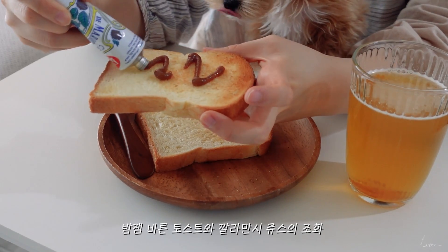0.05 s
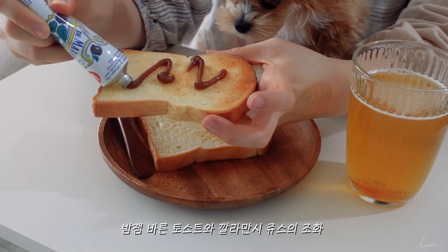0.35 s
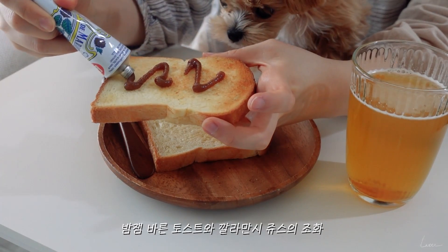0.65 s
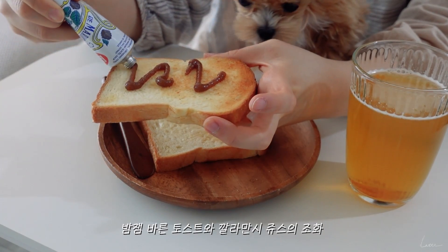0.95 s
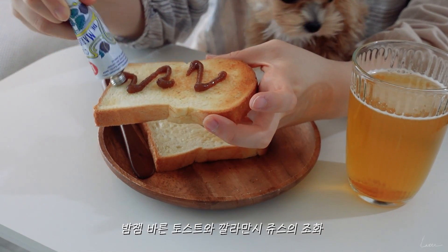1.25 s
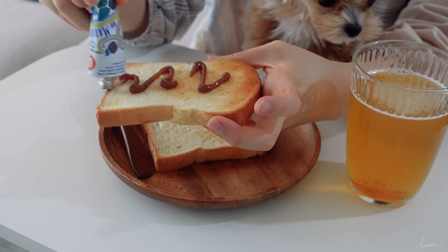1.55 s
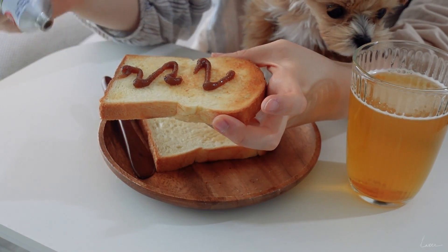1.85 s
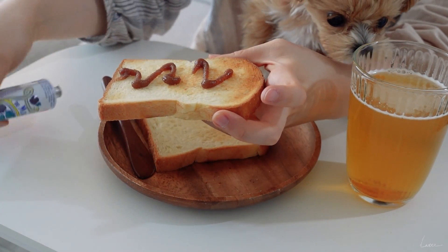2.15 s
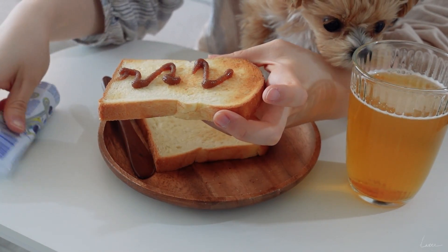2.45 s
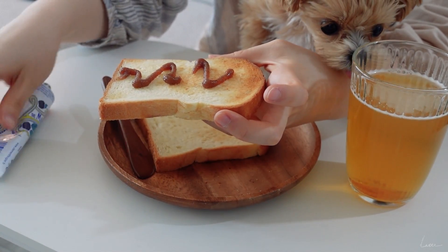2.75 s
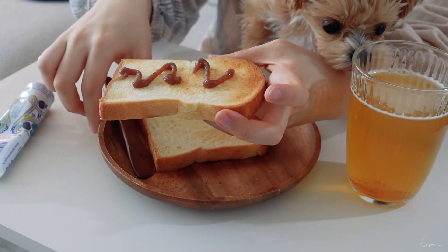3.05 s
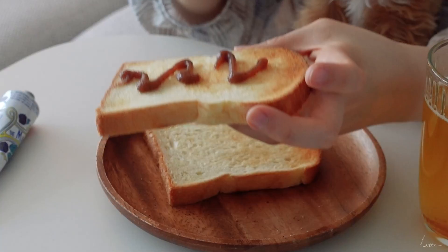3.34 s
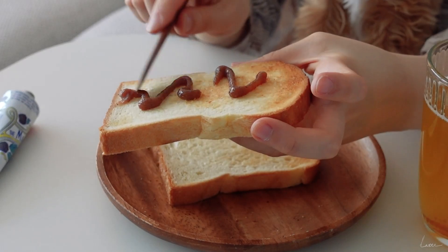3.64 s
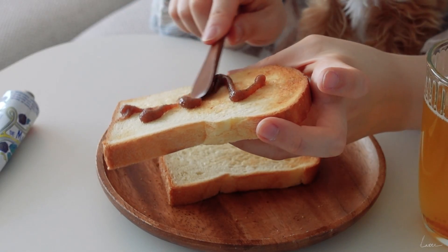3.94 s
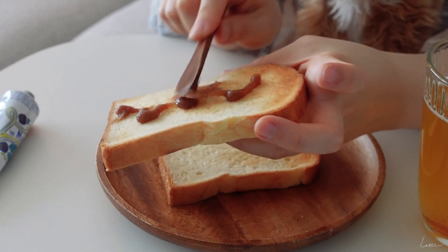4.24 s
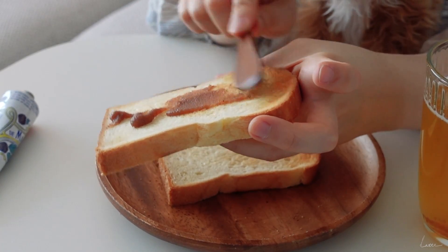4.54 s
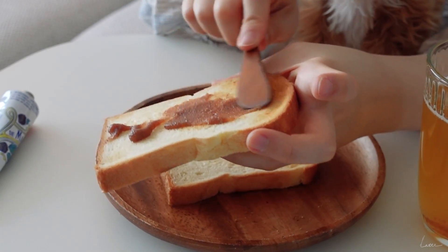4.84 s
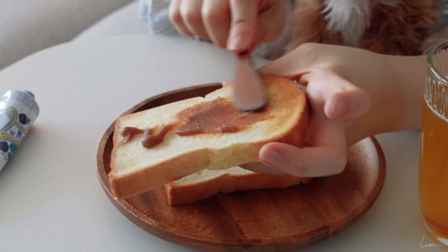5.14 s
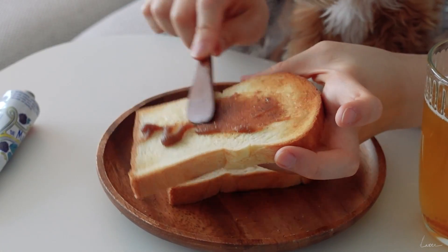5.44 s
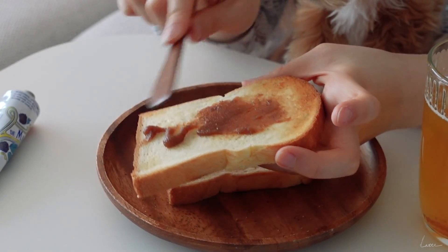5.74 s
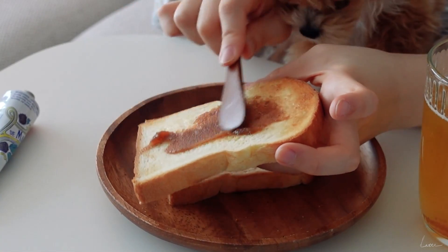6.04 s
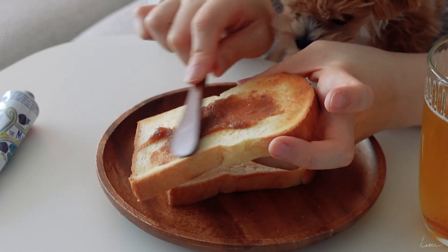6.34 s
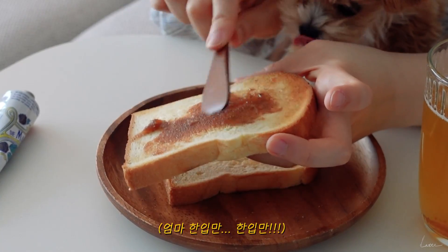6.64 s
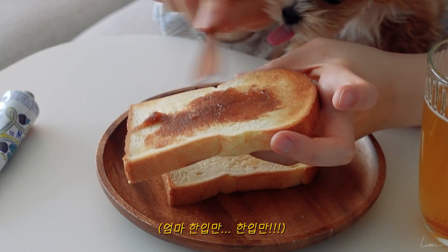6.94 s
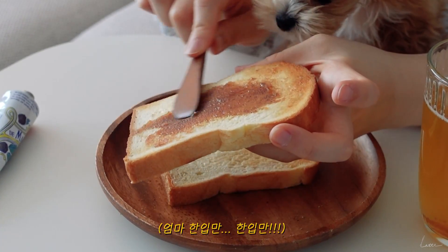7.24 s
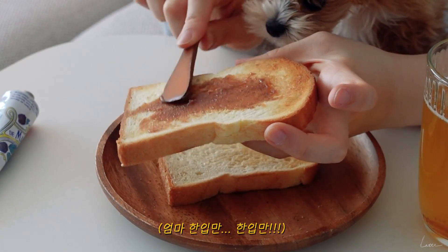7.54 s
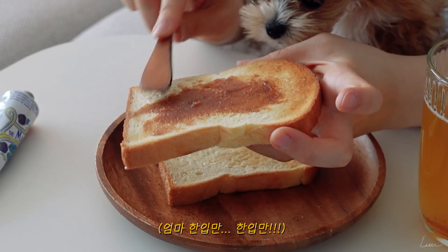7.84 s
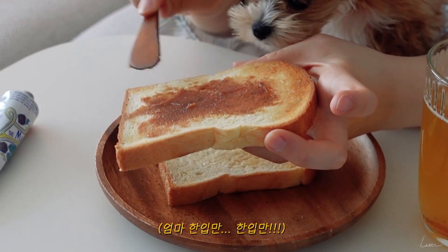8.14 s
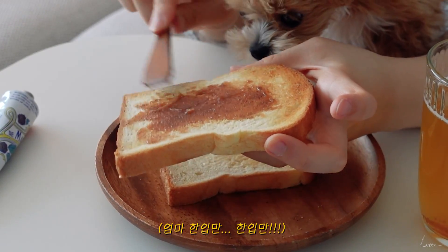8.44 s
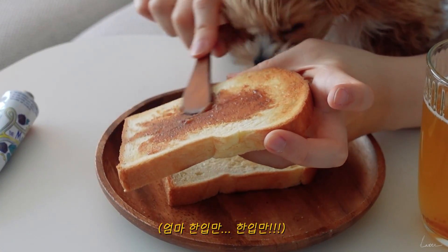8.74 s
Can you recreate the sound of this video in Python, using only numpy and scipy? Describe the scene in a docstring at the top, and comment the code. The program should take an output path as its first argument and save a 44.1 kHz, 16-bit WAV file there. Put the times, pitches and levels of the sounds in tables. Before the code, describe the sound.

A tube of paste crinkles and ticks softly as it is squeezed. It is then put down with two quick knocks that make the tabletop ring briefly, the loudest sounds here. A small knife slides off a plate with a faint metallic whisper, then spreads the paste over toast in short, scratchy strokes with tiny crust snaps. Everything is close and in stereo, in a quiet room with a steady, soft rush of air.

```python
"""A soft, steady rush of air fills a quiet room; all else is close by, in stereo. Chestnut paste is
squeezed from a crinkling tube onto toast. Near 2.4 s the tube is put down with two knocks, end first,
then flat, and the table rings. A small knife slides off the plate, its blade singing faintly. From 3.8 s
it spreads the paste in short strokes; the crust breaks under it as fine grains and ticks."""
import sys
import numpy as np
from scipy import signal
from scipy.fft import rfft, irfft
from scipy.io import wavfile

SR = 44100
rng = np.random.default_rng(int(sys.argv[2]) if len(sys.argv) > 2 else 0)


def master(y):
    """Save y as 16-bit WAV."""
    cut = np.clip(np.atleast_2d(y).T, -1, 1)
    pcm = np.round(cut * 32767)  # scale
    wavfile.write(sys.argv[1], SR, pcm.astype(np.int16))


N = 392049
TIME_S = np.arange(N) / SR
FREQ_HZ = np.maximum(np.arange(N + 1) * SR / (2 * N), 1)


def undb(db):
    """dB to gain."""
    return 10 ** (np.asarray(db) / 20)


def unit(x):
    """Scale to energy 1."""
    return x / np.sqrt(np.sum(x ** 2))


def fade(t, t60_s):
    """Exponential decay, 60 dB down at t60_s."""
    return np.exp(-np.log(1000) * t / t60_s)


def on_log(points, hz=FREQ_HZ):
    """Interpolate (Hz, value) points over log frequency."""
    point_hz, value = np.transpose(points)
    return np.interp(np.log(hz), np.log(point_hz), value)


def shaped_noise(db):
    """White noise filtered by a dB curve over FREQ_HZ."""
    return irfft(rfft(rng.standard_normal(N), 2 * N) * undb(db))[:N]


def band(x, lo_hz, hi_hz):
    """Band-pass; peak 1."""
    sos = signal.butter(3, [lo_hz, min(hi_hz, 0.45 * SR)], "bandpass", fs=SR, output="sos")
    y = signal.sosfilt(sos, x)
    return y / np.abs(y).max()


def response(points, tilt_db_oct=0, size=1024):
    """Minimum-phase impulse response of (Hz, dB) points, tilted above 1 kHz; energy 1."""
    hz = np.maximum(np.arange(size + 1) * SR / (2 * size), 1)
    db = on_log(points, hz) + tilt_db_oct * np.log2(np.maximum(hz, 1000))
    cepstrum = irfft(np.log(undb(db)))
    cepstrum[1:size] *= 2
    cepstrum[size + 1:] = 0
    return unit(irfft(np.exp(rfft(cepstrum)))[:size])


def waver(rate_hz, depth_db):
    """Gain gliding between random levels."""
    levels = rng.standard_normal(2048)
    return undb(depth_db * np.interp(TIME_S * rate_hz, np.arange(len(levels)), levels))


def add(track, start_s, sound):
    """Mix sound into track at start_s."""
    start = int(round(start_s * SR))
    part = sound[:max(N - start, 0)]
    track[start:start + len(part)] += part


def place(x, pan_db):
    """Mono to stereo; pan_db is left minus right."""
    return x * undb(np.array([[pan_db], [-pan_db]]) / 2)


def air(level_db=-62.5):
    """Ventilation: a soft, wide rush with broad resonances and a slight flicker."""
    # Each row: frequency in Hz, relative level in dB.
    spectrum = [(25, -19), (60, -18), (105, -6), (200, -0.5), (400, 0), (700, -2), (1300, -10),
                (2200, -5.5), (2700, -12), (4000, -15.5), (7000, -20.5), (15500, -22.5)]
    # Each row: centre in Hz, width in Hz, lift in dB.
    resonances = [(449, 62, 4.2), (1069, 240, 8), (1436, 230, 5.9), (2330, 150, 5)]
    # Each row: frequency in Hz, side minus mid in dB.
    stereo_width = [(60, -8.5), (200, -1.5), (700, -0.5), (1300, 1), (2400, 3), (4400, -1), (8000, 0.5),
                    (15000, -16)]
    lift_db = sum(db / (1 + (2 * (FREQ_HZ - hz) / width_hz) ** 2) for hz, width_hz, db in resonances)
    mid_db = on_log(spectrum) + lift_db
    mid = shaped_noise(mid_db)
    side = shaped_noise(mid_db + on_log(stereo_width))
    rush = unit(np.array([mid + side, mid - side])) * np.sqrt(2 * N)
    return rush * undb(level_db) * waver(rate_hz=10, depth_db=1.02)


def room(x, first_s=0.0026, build_s=0.0076):
    """Diffuse reflections of a small room, wider in the treble."""
    # Each row: nominal band centre in Hz, t60 in seconds.
    decays = [(150, 1), (600, 0.59), (1400, 0.48), (3000, 0.39), (6000, 0.43), (14000, 0.4)]
    edges_hz = [0, 300, 900, 2000, 4200, 9000, SR]
    t, tail = TIME_S[:SR], 0
    noise = rfft(rng.standard_normal((2, SR)))
    hz = np.arange(noise.shape[1])
    for lo_hz, hi_hz, (centre_hz, t60_s) in zip(edges_hz, edges_hz[1:], decays):
        mid, side = irfft(noise * ((hz >= lo_hz) & (hz < hi_hz)), SR) * fade(t, t60_s)
        side = side * undb(on_log([(1300, -9), (3200, -3)], centre_hz))
        tail = tail + np.array([mid + side, mid - side])
    onset = np.clip((t - first_s) / build_s, 0, 1)
    tail = unit(tail * onset) * np.sqrt(2)
    return signal.fftconvolve(x[None], tail, axes=1)[:, :N]


def blade(start_s=3.09, end_s=3.46, ramp_s=0.016, level_db=-77):
    """Uneven friction excites the steel blade as it slides off the plate."""
    # Each row: centre in Hz, width in Hz, relative level in dB.
    resonances = [(3100, 420, -1), (4240, 280, 4), (5100, 540, -5), (6400, 820, 0.5), (9470, 420, -3)]
    gain = sum(undb(db) / (1 + (2 * (FREQ_HZ - hz) / width_hz) ** 2) for hz, width_hz, db in resonances)
    ring = unit(shaped_noise(20 * np.log10(gain))) * np.sqrt(N)
    contact = np.clip(np.minimum(TIME_S - start_s, end_s - TIME_S) / ramp_s, 0, 1)
    return undb(level_db) * ring * contact * waver(rate_hz=45, depth_db=2.5)


def chatter(t60_s, first_db, size=4096):
    """An impact and a dying train of tiny ones; flat spectrum, energy 1."""
    envelope = fade(TIME_S[:size], t60_s)
    x = unit(rng.standard_normal(size) * envelope)
    x[0] += undb(first_db)
    for _ in range(8):  # whiten, then restore the decay
        spectrum = rfft(x)
        x = irfft(spectrum / np.abs(spectrum)) * np.minimum(5 * envelope, 1)
    return unit(x)


def knocks(swell_s=0.0014):
    """The tube lands end first, then flat: each contact chatters and rings the table top."""
    # Each row: start in seconds, clack energy in dB, clack t60 in seconds, ring gain in dB.
    landings = [(2.3788, 0.5, 0.058, -30.5), (2.5565, 1.5, 0.025, -26)]
    # Clack spectra. Each row: frequency in Hz, relative level in dB.
    end_clack = [(60, -43), (100, -42), (324, -25), (700, -8.5), (1150, 0), (1450, 2.5), (1770, -10.5),
                 (2150, -7), (2800, -10.5), (4000, -18.5), (4600, -27), (6000, -27), (8000, -39),
                 (15000, -59)]
    flat_clack = [(60, -36.5), (200, -34), (420, -7.5), (800, -10.5), (1100, -10), (1450, 1), (1800, -6),
                  (2300, -6.5), (3050, -0.5), (3450, -7), (3900, -5), (4500, -13.5), (6000, -20.5),
                  (8000, -31.5), (15000, -48)]
    # Table and tube. Each row: frequency in Hz, t60 in seconds, end-hit level in dB, flat-hit level in dB.
    table_modes = [(179, 0.22, -47, -27), (247, .35, -35, -29.5), (368, .39, -33, -21),
                   (493, 0.25, -20, -11.5), (618, 0.36, -11, -19), (670, .36, -8.5, -28),
                   (762, .25, -9, -15), (982, 0.22, -5, 0), (1110, 0.5, -17.5, -21), (1186, 0.12, -7, -18),
                   (1270, 0.25, -5, -9), (1210, 0.36, -18.5, -22), (1395, 0.35, -1, -13),
                   (1380, 0.15, -23, 5.5), (1530, .25, -19, -13.5), (1620, 0.29, -24, -30),
                   (2015, 0.32, -20, -12), (2076, 0.21, -6, -6.5), (2940, .2, -22.5, -19),
                   (2885, .14, -25, -10.5), (3070, 0.27, -25, -8), (3070, 0.18, -22, -17),
                   (3790, .17, -24, -6), (3950, 0.2, -21, -25), (5000, 0.2, -28, -19),
                   (5820, 0.28, -35, -25)]
    hz, t60_s, *strike_db = np.transpose(table_modes)[:, :, None]
    clacks, rings, t = np.zeros(N), np.zeros(N), TIME_S[:SR]
    for landing, spectrum, mode_db in zip(landings, (end_clack, flat_clack), strike_db):
        start_s, clack_db, clack_t60_s, ring_db = landing
        clack = signal.fftconvolve(chatter(clack_t60_s, first_db=-7), response(spectrum))
        add(clacks, start_s, undb(clack_db) * unit(clack))
        phase = 2 * np.pi * rng.random(hz.shape)
        modes = undb(mode_db) * fade(t, t60_s) * np.sin(2 * np.pi * hz * t + phase)
        add(rings, start_s, undb(ring_db) * modes.sum(0) * (1 - np.exp(-t / swell_s)))
    return clacks, rings


def ticks(rows, band_ratio=1.47, gain_db=1):
    """Each quick crack rings a broad resonance, with a bright snap on top."""
    out = np.zeros(N)
    for start_s, peak_db, hz, treble_db in rows:
        crack = chatter(t60_s=0.0073, first_db=-2, size=1024)
        ring = band(crack, hz / band_ratio, hz * band_ratio)
        tick = ring + undb(treble_db) * band(crack, 6260, 10600)
        add(out, start_s, undb(peak_db + gain_db) * tick / np.abs(tick).max())
    return out


def snaps():
    """Loud single snaps of crust, tube and knife."""
    # Each row: start in seconds, relative peak in dB, ring in Hz, treble over ring in dB.
    cracks = [(.0112, -36, 3300, 2.5), (.3917, -52, 4100, -2), (.8395, -41.5, 3020, -7),
              (.9138, -38.5, 3900, -1), (1.1042, -49, 4900, 6), (2.801, -40, 2300, -9),
              (2.828, -48, 2700, -10), (3.805, -46.5, 3920, -16), (3.836, -35.5, 3250, -9),
              (3.9452, -39.5, 5500, 0), (3.958, -38.5, 3600, -2), (5.248, -42.5, 2780, -3),
              (5.518, -44, 3780, -1.5), (5.5452, -41, 3200, 7), (6.5037, -37, 6140, -2),
              (6.921, -39.5, 3100, -33), (8.7442, -45, 5900, -28), (8.82, -48, 2970, -1)]
    return ticks(cracks)


def pressure(t, length_s, attack_share=0.46, release_s=0.016, cling_db=-13, cling_s=0.17):
    """Stroke force: builds, holds, lets go; sticky paste keeps a little contact."""
    attack = np.sin(np.pi / 2 * np.minimum(t / (attack_share * length_s), 1)) ** 2
    after_s = np.maximum(t - length_s, 0)
    cling = undb(cling_db)
    return attack * ((1 - cling) * np.exp(-after_s / release_s) + cling * np.exp(-after_s / cling_s))


def crumbs(strokes, rate_hz=18, over_db=10, spread_db=4.5, ring_hz=3530, treble_db=-8.5, tries=8):
    """Lesser snaps at random within each stroke, louder under more force."""
    rows = []
    for start_s, length_s, level_db, *_ in strokes:
        chance, position = rng.random((2, tries))
        offset_s = position * length_s
        force_db = level_db + 20 * np.log10(pressure(offset_s, length_s))
        peak_db = force_db + over_db + spread_db * rng.standard_normal(tries)
        breaks = chance < rate_hz * length_s / tries
        rows += [(start_s + s, db, ring_hz, treble_db) for s, db in zip(offset_s[breaks], peak_db[breaks])]
    return ticks(rows)


def rubbing(strokes, resonances, grains_per_s, spread_db, catches_per_s, catch_db, colour_db, gain_db):
    """Each stroke breaks a shower of tiny grains; the contact catches and slips unevenly."""
    # Rasp spectrum. Each row: frequency in Hz, relative level in dB.
    crust = [(40, -56), (150, -15.5), (500, -6.5), (1000, -5), (1500, -1.5), (1950, -1), (3100, 1.5),
             (4500, -5), (5700, 0.5), (6500, -4), (10300, -9), (11500, -15.5), (15500, -21)]
    out, t = np.zeros(N), TIME_S[:SR]
    hz, width_oct = np.geomspace(40, 16000, 96), 0.36
    peaks = sum(share * np.exp(-(np.log2(hz / centre) / width_oct) ** 2) for centre, share in resonances)
    for start_s, length_s, level_db, tilt_db_oct, lift_db in strokes:
        sizes = undb(spread_db * np.minimum(rng.exponential(size=SR), 4))
        grains = (rng.random(SR) < grains_per_s / SR) * sizes * rng.choice([-1, 1], SR)
        slip_index = np.cumsum(rng.random(SR) < catches_per_s / SR)
        grains *= undb(catch_db * rng.standard_normal(SR + 1))[slip_index]
        drive = unit(grains) * np.sqrt(SR) * pressure(t, length_s)
        # every patch rings a little differently
        patch_db = on_log(crust, hz) + lift_db * peaks + colour_db * rng.standard_normal(len(hz))
        rasp = signal.fftconvolve(drive, response(np.column_stack([hz, patch_db]), tilt_db_oct))
        add(out, start_s, undb(level_db + gain_db) * rasp)
    return out


def handling(wall_hz=5000, wall_lift_db=0.5):
    """The tube crinkles as it is squeezed and let go; the knife rubs off the plate."""
    # Each row: start in seconds, length in seconds, relative level in dB, tilt in dB per octave.
    moves = [(0, 0.0084, -46.5, -1.5), (0.041, 0.063, -64, -6), (0.271, 0.18, -71.5, -1),
             (0.497, 0.29, -75.5, 0), (0.824, 0.047, -64, -0.5), (0.908, 0.013, -60, -0.5),
             (1.081, 0.12, -66, 2.5), (1.263, .14, -62.5, 0), (1.587, 0.06, -66, -3),
             (2.816, 0.032, -54, -8), (3.149, 0.14, -65, -5.5)]
    strokes = [(*move, wall_lift_db) for move in moves]
    crinkle = rubbing(strokes, [(wall_hz, 1)], grains_per_s=2900, spread_db=4,
                      catches_per_s=140, catch_db=2.5, colour_db=1.5, gain_db=-1)
    return crinkle + crumbs(strokes)


def spreading():
    """The knife rasps over the toast; drier crust makes the edge bite and lifts its resonances."""
    # Each row: start and length in seconds, relative level in dB, tilt in dB per octave, bite in dB.
    strokes = [(3.765, 0.13, -52.5, -1.3, 1.5), (3.881, 0.036, -54.5, 4, 6), (3.935, .025, -58, 3, 2),
               (4.036, .05, -64, -3, 0.5), (4.535, 0.037, -59, -3.5, 11), (4.905, .022, -66, 5, 0),
               (5.234, 0.057, -54, -3.5, 13.5), (5.263, .275, -60.5, -2, 6), (5.656, 0.068, -65, -3, 5),
               (5.932, 0.036, -61, -3.5, 5), (6.33, 0.06, -67, 4, 0), (6.391, 0.16, -51.5, 1.5, 0),
               (6.772, 0.031, -64, -2.5, 3), (6.835, .045, -60.5, 1.5, 7), (7.172, 0.029, -66.5, -4, 6),
               (7.517, 0.04, -59.5, -5.5, -4), (7.659, .07, -57, 0, 0.5), (8.024, 0.051, -60.5, -2.5, 3),
               (8.382, 0.075, -56.5, -1, 2.5), (8.76, 0.12, -58, -4.5, 7)]
    # Edge on crust. Each row: resonance in Hz, share of the bite.
    edge = [(3600, 0.43), (10400, 1)]
    rasp = rubbing(strokes, edge, grains_per_s=7000, spread_db=3,
                   catches_per_s=220, catch_db=2.2, colour_db=2.5, gain_db=-3)
    return rasp + crumbs(strokes)


def scene():
    """Air, room reflections, and the close tube, table and knife."""
    background = air()
    clacks, rings = knocks()
    toast = handling() + blade() + spreading() + snaps()
    reflections = room(undb(-5) * toast + undb(-1.5) * clacks + undb(-13) * rings)
    direct = place(toast, pan_db=-3) + place(clacks, pan_db=-2) + place(rings, pan_db=1.5)
    return background + reflections + direct


def record(dry, low_hz=55, top_hz=15750):
    """Thin the deep bass, cut the top steeply."""
    thinned = signal.sosfilt(signal.butter(2, low_hz, "highpass", fs=SR, output="sos"), dry)
    return signal.sosfilt(signal.ellip(10, 0.2, 70, top_hz, fs=SR, output="sos"), thinned)


dry = scene()
out = record(dry)
master(out)
```